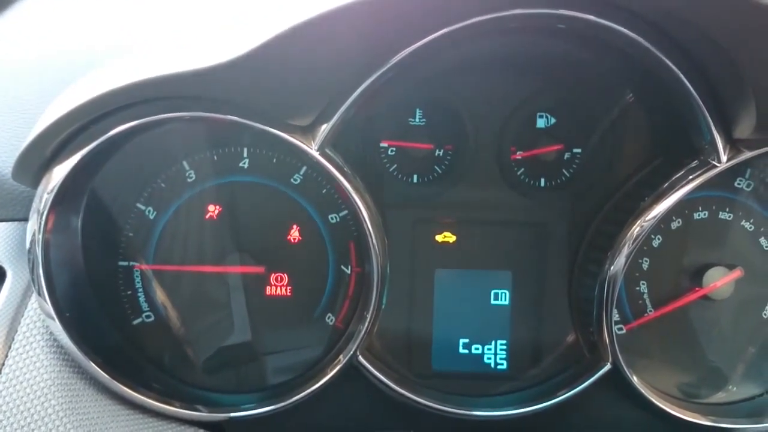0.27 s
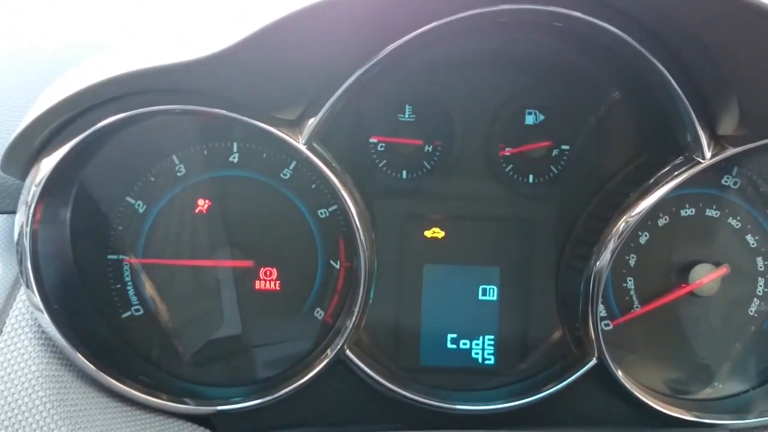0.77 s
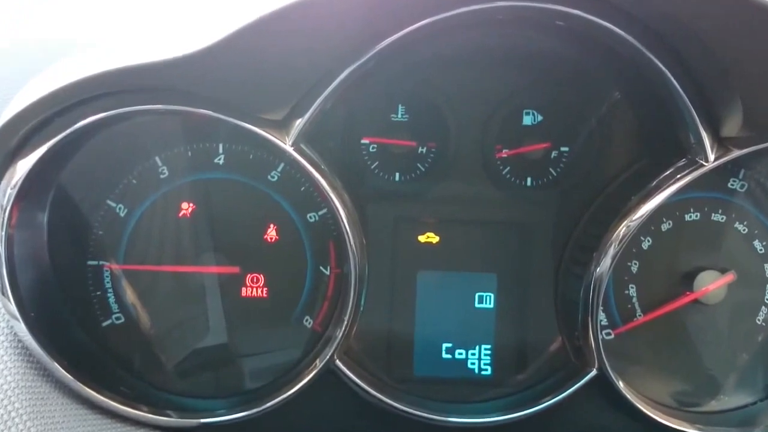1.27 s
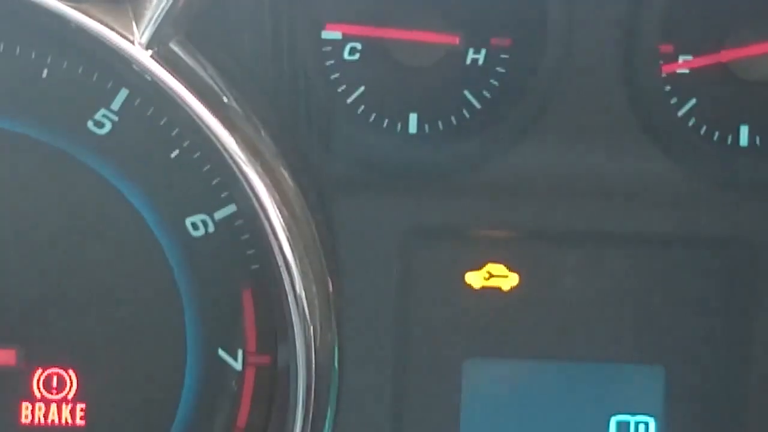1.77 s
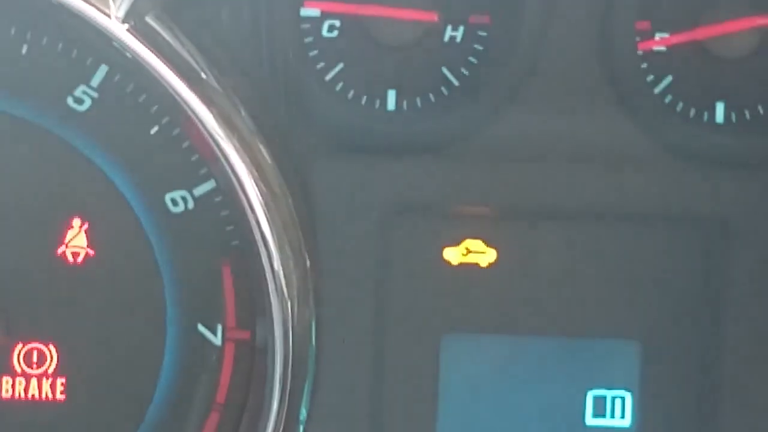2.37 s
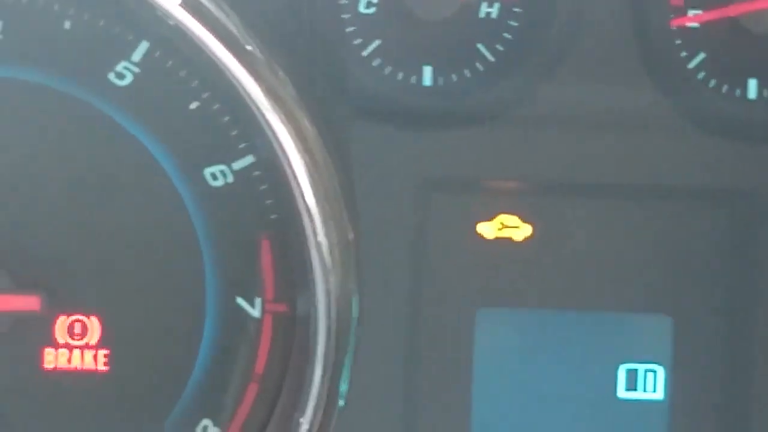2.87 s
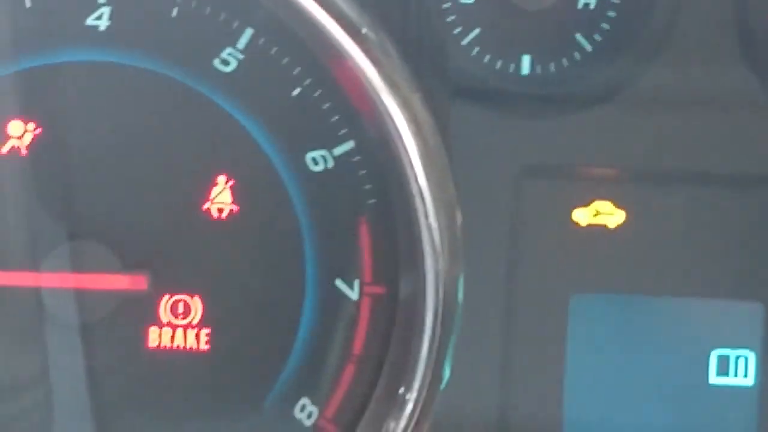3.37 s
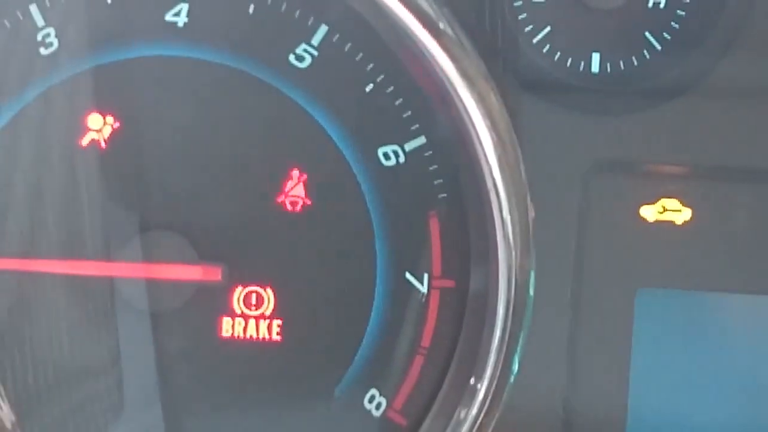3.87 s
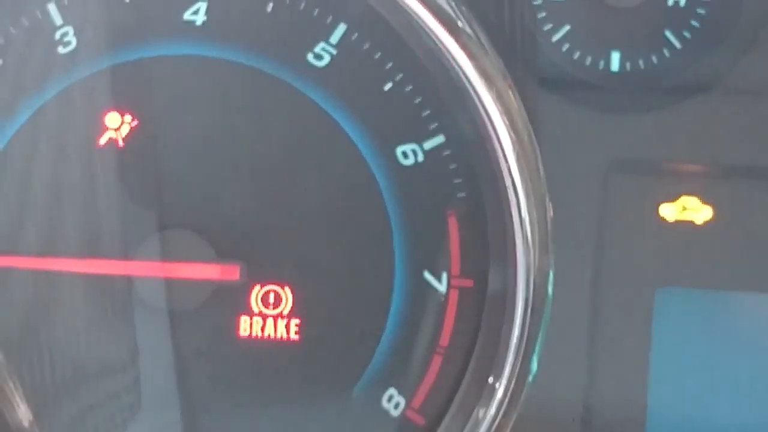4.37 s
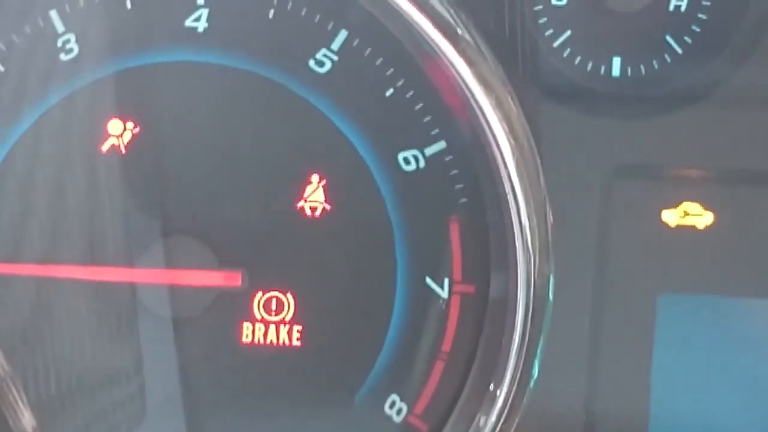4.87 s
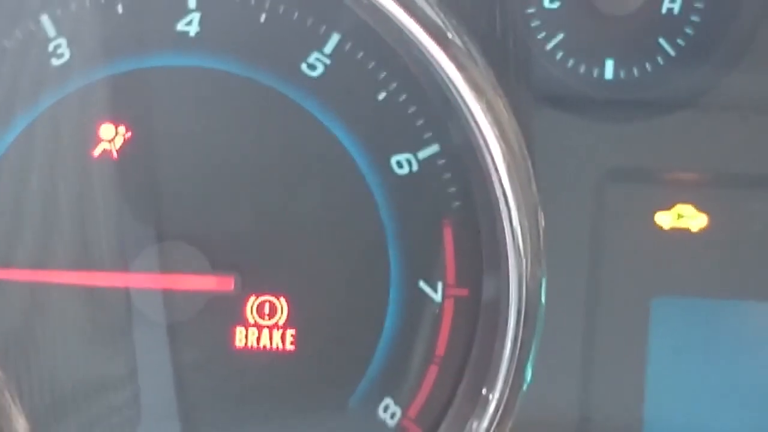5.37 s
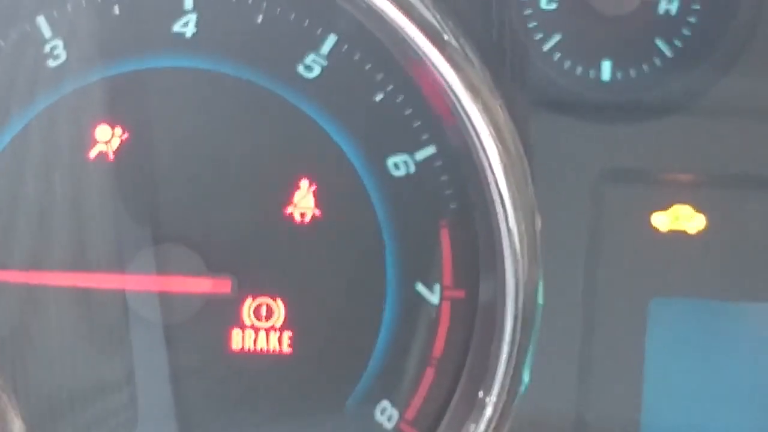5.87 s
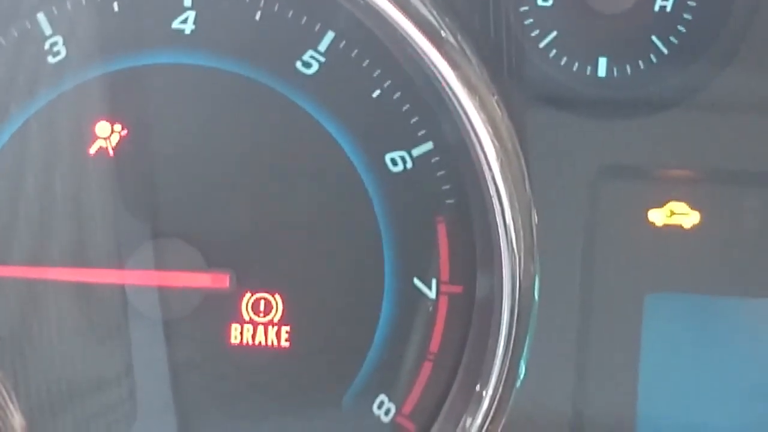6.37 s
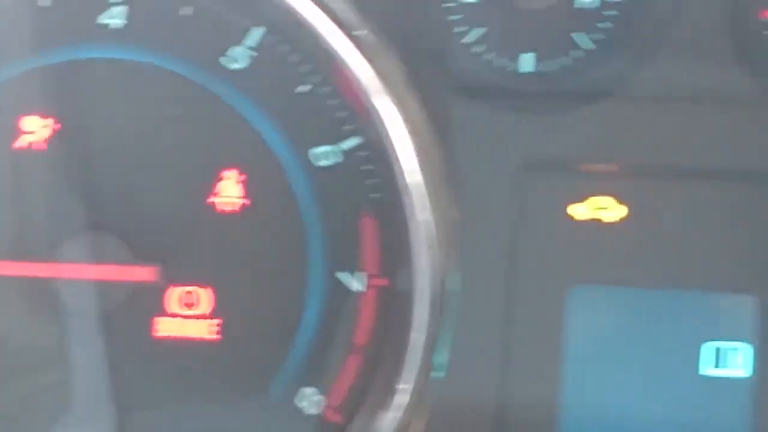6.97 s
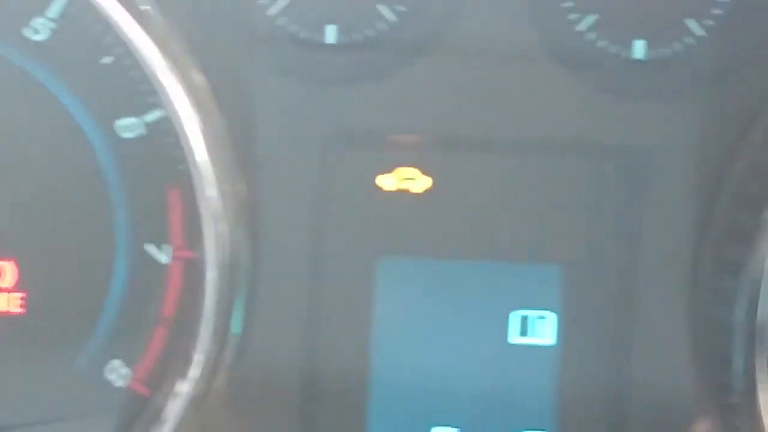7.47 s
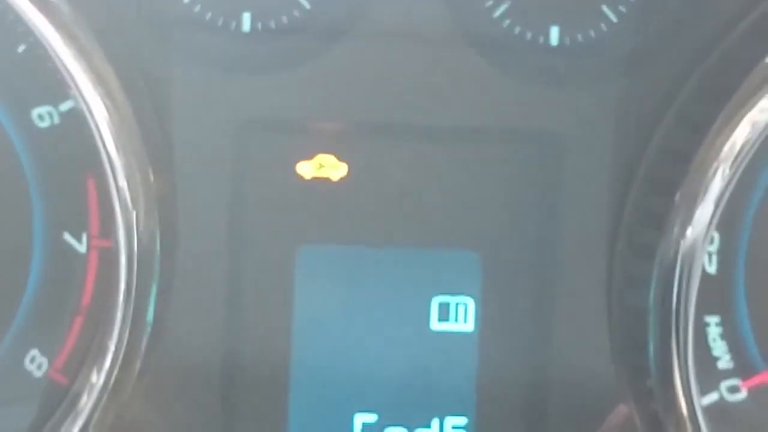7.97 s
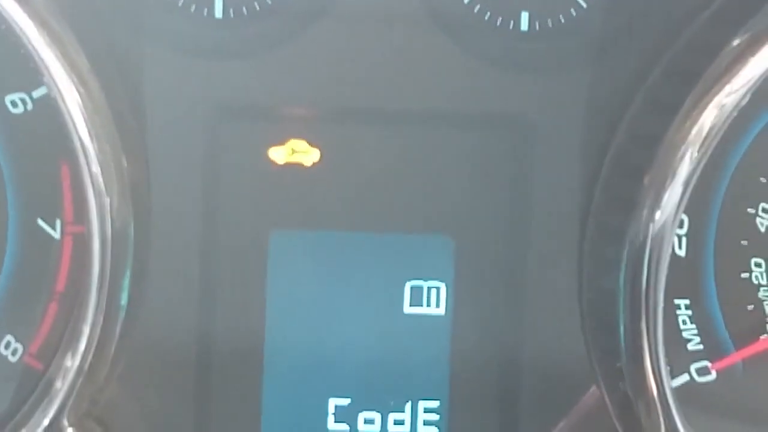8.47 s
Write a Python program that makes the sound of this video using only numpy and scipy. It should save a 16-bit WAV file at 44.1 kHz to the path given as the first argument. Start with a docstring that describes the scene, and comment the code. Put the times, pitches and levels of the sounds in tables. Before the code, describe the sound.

A four-cylinder petrol engine idles for the whole 8.7 seconds, heard inside a closed car from the driver's seat: a deep throbbing drone with a low cabin boom, muffled rumble, faint motor hums and a thin hiss of air. The idle wavers a little, sagging slightly around 2.2 seconds and again near the end. Close to the right microphone, a hand shifts on the camera until about 2.6 seconds, with low thumps, short rubs and plastic clicks near 0.35, 0.75, 1.2 and 1.8. Thin, faint, gliding chirps, perhaps a bird outside, appear around 0.7 to 0.9, very weakly at 3.8, and at 7.2 and 7.7. A soft airy whistle swells at 2.5, then three brief times between 5.0 and 5.5, beside a small dull click at 5.1. Faint grip movements return around 7.3 and 8.1 as the engine keeps running.

```python
"""A four-cylinder petrol engine idles near 1050 rpm throughout, heard from the driver's seat of a closed car:
shaft orders drone and boom over noise rumble, two motor hums and a faint hiss of air, all shaped noise and tones.
Up to 2.6 s a hand shifts its grip on the camera at the right port: noise thumps, rubs, ringing case clicks.
Thin gliding chirps come at 0.7, 3.8 and 7.2 s, a soft noise-band whistle at 2.5 s and three times from 5 s.
One more click falls at 5.1 s; faint grip shifts return at 7.3 and 8.1 s."""
import sys
import numpy as np
from scipy import signal
from scipy.fft import rfft, irfft, next_fast_len
from scipy.io import wavfile
from scipy.ndimage import uniform_filter1d

SR = 44100
rng = np.random.default_rng(int(sys.argv[2]) if len(sys.argv) > 2 else 0)


def pcm_store(signal):
    """Save signal as 16-bit PCM."""
    levels = np.round(np.clip(np.atleast_2d(signal), -1, 1) * 32767)
    wavfile.write(sys.argv[1], SR, levels.astype(np.int16).T)


N = 384091
TIME = np.arange(N) / SR


def undb(db):
    """Decibels to amplitude gain."""
    return 10 ** (np.asarray(db) / 20)


def at(points, hz):
    """Interpolate (Hz, dB) points on a log-frequency axis, flat beyond the ends."""
    points_hz, points_db = np.transpose(points)
    return np.interp(np.log(np.maximum(hz, 1)), np.log(points_hz), points_db)


def colour(x, points):
    """Filter with the gain curve of (Hz, dB) points."""
    size = next_fast_len(N)
    hz = np.arange(size // 2 + 1) * SR / size
    return irfft(rfft(x, size) * undb(at(points, hz)), size)[:N]


def noise(points):
    """Gaussian noise with the density of (Hz, dB per Hz) points."""
    return colour(rng.standard_normal(N), points) * np.sqrt(SR / 2)


def unit(x):
    """Scale to standard deviation 1."""
    return x / np.std(x)


def walk(rate_hz):
    """Random levels, each held 1 / rate_hz and smoothed twice; spread 1."""
    hold = max(int(SR / rate_hz), 1)
    held = np.repeat(rng.standard_normal(N // hold + 1), hold)
    smooth = uniform_filter1d(uniform_filter1d(held, hold), hold)
    return unit(smooth[:N])


def swell(centre_s, width_s):
    """Gaussian bump in time, peak 1; width_s is its standard deviation."""
    return np.exp(-.5 * ((TIME - centre_s) / width_s) ** 2)


def resonance(hz, centre_hz, width_hz):
    """Resonance gain: 1 at the centre, half at width_hz / 2 to either side."""
    return 1 / (1 + (2 * (hz - centre_hz) / width_hz) ** 2)


def engine_line(turns, order, unsteady, shake_hz=9):
    """One order of a turning shaft, rms near 1; uneven running shakes its size and phase."""
    knots_s = np.arange(0, TIME[-1] + 1, .5 / shake_hz)
    size, phase_rad = (np.interp(TIME, knots_s, unsteady * rng.standard_normal(len(knots_s)))
                       for _ in range(2))
    tone = (1 + size) * np.cos(2 * np.pi * (order * turns + rng.random()) + phase_rad)
    return tone * np.sqrt(2 / (1 + unsteady ** 2))


def air(speed_hz, vent_db=0.0, rise_db_per_hz=1.6):
    """Vent air, stronger at higher engine speed, plus microphone hiss; independent noise at each port."""
    # Vent air. Each row: frequency in Hz, left and right density in dB per Hz at mean engine speed.
    vent_points = [(106, -74.5, -88), (402, -99, -99), (930, -106.5, -103), (1410, -108, -104.3),
                   (2480, -111, -106.5), (4260, -116, -110.3), (5450, -120, -109.5), (6700, -127, -119),
                   (12200, -140, -132)]
    # Microphone hiss with two port resonances. Each row: frequency in Hz, left and right density in dB per Hz.
    mic_points = [(6600, -120.5, -119), (7640, -119, -119), (8500, -115.3, -118.5), (9200, -120, -119.4),
                  (11400, -121, -119.8), (12500, -115.8, -117.7), (13600, -121, -120)]

    def two_ports(table):
        """Independent noise from the left and right columns."""
        return np.array([noise(np.array(table)[:, [0, column]]) for column in (1, 2)])

    level_db = vent_db + rise_db_per_hz * (speed_hz - speed_hz.mean())
    return undb(level_db) * two_ports(vent_points) + two_ports(mic_points)


def whistle(centre_hz=2075, width_hz=160, left_db=-5, flutter_db=0.3):
    """A narrow band of air noise swells, flutters and fades; independent at each port."""
    # Each row: centre in seconds, right-port level in dB before flutter, Gaussian width in seconds.
    whistle_events = [(2.54, -79.5, .25), (5.0, -77, 0.078), (5.245, -74, .06), (5.498, -75, .13)]
    hz = np.geomspace(centre_hz / 10, centre_hz * 10, 800)
    band = np.column_stack([hz, 20 * np.log10(resonance(hz, centre_hz, width_hz))])
    level = sum(undb(db) * swell(s, width_s) for s, db, width_s in whistle_events)
    level = level * undb(flutter_db * walk(12))
    return level * np.array([undb(left_db) * unit(noise(band)), unit(noise(band))])


def chirps(arch_hz_per_s2=31000, left_db=-12, waver_hz=120, flutter_db=3.5):
    """Thin chirps, perhaps a bird outside: wavering tones that glide along a shallow arch."""
    # Each row: centre in seconds, right-port peak level in dB before flutter, middle pitch in Hz before waver,
    # glide at the middle in Hz per second, Gaussian width in seconds.
    chirp_events = [(.73, -75, 5420, 3200, .035), (.85, -77, 5560, 900, .045), (3.81, -85, 4980, 4, .05),
                    (7.24, -76, 5470, -900, .07), (7.67, -76.5, 5380, -3200, .055)]
    out = np.zeros(N)
    for s, db, middle_hz, glide_hz_per_s, width_s in chirp_events:
        t = np.clip(TIME - s, -4 * width_s, 4 * width_s)
        hz = middle_hz + glide_hz_per_s * t - arch_hz_per_s2 * t ** 2 + waver_hz * walk(200)
        level = undb(db + flutter_db * walk(90)) * swell(s, width_s)
        out += level * np.sin(2 * np.pi * np.cumsum(hz) / SR)
    return np.array([undb(left_db) * out, out])


def rubbing(grain_db=0.5, grain_hz=260):
    """Skin sticks and slips on plastic: coloured noise with an uneven level; spread 1."""
    # Each row: frequency in Hz, relative density in dB.
    rub_points = [(150, -30.5), (320, 3.5), (430, 5.5), (560, -4.5), (700, -8.5), (1500, -28),
                  (5000, -40.5), (12000, -46)]
    return unit(noise(rub_points) * undb(grain_db * walk(grain_hz)))


def grip(hold_db=-25.5, sway_db=-24, flex_db=-41, rub_db=-63, hiss_db=-72, sag_s=0.13, push_hiss_db=-64):
    """The hand pumps air at the port, flexes the case and rubs on it."""
    # Grip shifts. Each row: centre in seconds, strength in dB on the scale of hold_db, Gaussian width in seconds.
    shift_events = [(0.286, 0, 0.13), (0.573, 3.5, .04), (0.847, -3.5, 0.1), (1.23, 7, 0.047),
                    (1.72, 2, 0.093), (2.04, -2, 0.074), (2.573, -5, 0.12), (7.315, -7, 0.13),
                    (8.102, -12.5, 0.33)]
    # Fingers slide on the case. Each row: centre in seconds, level in dB, Gaussian width in seconds.
    rub_events = [(0.218, -58, 0.018), (0.752, -48, 0.014), (0.835, -64, 0.035), (1.228, -58, 0.0092),
                  (1.816, -45.5, 0.013)]
    # A finger squeezes air into the port. Each row: centre in seconds, push in dB before the sag,
    # Gaussian width in seconds.
    press_events = [(0.398, -3.5, 0.036), (1.847, -3, 0.03)]

    # hold_db: steady tremor of the resting hand
    restless = undb(hold_db) + sum(undb(db) * swell(s, width_s) for s, db, width_s in shift_events)
    sway = unit(noise([(2, -3.5), (5, -2), (10, -9.5), (20, -20.5), (45, -23.5),
                       (150, -46.0), (500, -100), (2000, -140)]))
    flex = unit(noise([(40, -25), (85, -7.5), (103, 7.5), (125, -10.0), (250, -18.5),
                       (900, -61), (4000, -95.5)]))
    hiss = unit(noise([(500, 7.0), (3500, -4.0), (7000, -15), (15000, -19.0)]))
    rub = rubbing()
    mix = undb(sway_db) * sway + undb(flex_db) * flex + undb(rub_db) * rub + undb(hiss_db) * hiss
    out = restless * mix
    for s, db, width_s in rub_events:
        out += undb(db) * swell(s, width_s) * rub
    for s, db, width_s in press_events:
        push = swell(s, width_s)
        # a faint hiss rides on the push, and the pressure sags on both sides of it
        sag = width_s / sag_s * swell(s, sag_s)
        out += undb(db) * (push - sag + undb(push_hiss_db) * push * hiss)
    return out


def clicks(snap_db=-33, snap_ms=0.79):
    """Short pushes ring the damped plastic case; a softer contact leaves only the low modes."""
    # Each row: centre in seconds, strength in dB, contact softness (Gaussian width) in ms,
    # extra weight of the lowest mode in dB, factor on the ring times.
    click_events = [(0.349, -22, 0.58, 1.5, 1.1), (0.7393, -17.5, 0.36, -29, 2),
                    (1.229, -17, 0.082, 2, 1.41), (1.81, -31, 0.26, -12, 2.2),
                    (1.8199, -13, 0.34, -2, 1.43), (5.078, -28, 1.2, -8, 1.8)]
    # Case modes, lowest first. Each row: frequency in Hz, relative level in dB,
    # 60 dB decay time in seconds before the ring factor.
    case_modes = [(278, 6.5, 0.0062), (440, -8.5, 0.0088), (802, -12.5, 0.015), (1525, -0.5, 0.0031),
                  (2060, -28, 0.0031), (3100, -11.5, 0.0032), (5800, -1.5, 0.0062)]
    t = TIME[:SR // 10]
    out = np.zeros(N)
    snap = np.zeros(N)
    for s, db, soft_ms, lowest_db, ring in click_events:
        lowest, *upper = [undb(mode_db - 60 * t / (t60_s * ring)) * np.sin(2 * np.pi * hz * t)
                          for hz, mode_db, t60_s in case_modes]
        body = undb(lowest_db) * lowest + sum(upper)
        ms = (TIME - s) * 1000
        push = np.exp(-.5 * (ms / soft_ms) ** 2)
        out += undb(db) * signal.oaconvolve(push / push.sum(), body)[:N]
        # the bright snap weakens fast with softness
        snap += undb(db + snap_db) * np.exp(-10 * soft_ms - np.abs(ms) / snap_ms)
    return out + snap * rng.standard_normal(N)


def motors(drift=0.00207, unsteady=0.12):
    """Electric motors, likely cooling fan and fuel pump: harmonic hums whose speeds wander a little."""
    # Each row: mean rotation in Hz, list of (harmonic number, level in dB).
    motor_lines = [(122.3, [(1, -47), (2, -82.5), (3, -71)]), (217.6, [(1, -75.5), (3, -87.5), (4, -86)])]
    out = np.zeros(N)
    for hz, harmonics in motor_lines:
        turns = np.cumsum(hz * (1 + drift * walk(1.5))) / SR
        for k, db in harmonics:
            out += undb(db) * engine_line(turns, round(k), unsteady * round(k))
    return out


def rumble(turns, shake, throb=0.19, flicker_db=1.0, shared_db=-1.7, diffuse_db=-5.5, shake_share=0.92):
    """Block noise swells twice a turn, as the firings do; its diffuse part differs between the ports."""
    # Combustion and mechanical noise behind the bulkhead.
    # Each row: frequency in Hz, density in dB per Hz before the shared and diffuse gains.
    block_points = [(25, -56), (45, -64.5), (85, -71), (150, -69.5), (200, -79), (270, -91), (350, -93.5),
                    (440, -93), (550, -98), (690, -97), (770, -104), (900, -103), (1600, -122),
                    (4000, -150)]
    surge = (1 + throb * np.cos(4 * np.pi * turns)) * undb(flicker_db * walk(10))
    surge = surge * (shake / shake.mean()) ** shake_share
    diffuse_tilt = [(130, -4.0), (350, 10.5), (900, -10.5)]
    diffuse = np.array([colour(noise(block_points), diffuse_tilt) for _ in range(2)])
    return surge * (undb(shared_db) * noise(block_points) + undb(diffuse_db) * diffuse)


def drone(turns, speed_hz, shake, firing_unsteady=0.088, unsteady_per_order=.02, boom_unsteady=0.12,
          firing_db=-26, upper_db=-29, boom_db=-39):
    """Two firings a turn and other shaft orders; order 8 booms as it meets the cabin air resonance."""
    # Each row: multiple of crankshaft speed, level in dB re firing_db for order 2, re upper_db for the rest.
    order_levels = [(1, -33), (2, 0), (4, -16.5), (6, -27), (8.5, -31), (9, -35), (10, -31.5), (12, -47),
                    (14, -40.5), (15, -48), (16, -43), (18, -40), (19, -50), (20, -47), (21, -46),
                    (22, -52), (23, -52), (24, -52), (40, -57)]
    boom_order = 8
    boom = undb(boom_db) * resonance(boom_order * speed_hz, centre_hz=141.38, width_hz=5.56)
    out = boom * engine_line(turns, boom_order, boom_unsteady)
    for order, db in order_levels:
        if order == 2:
            out += undb(firing_db + db) * shake * engine_line(turns, order, firing_unsteady)
        else:
            out += undb(upper_db + db) * engine_line(turns, order, unsteady_per_order * order)
    return out


def engine_and_motors(speed_hz, left_bass_cut_hz=41, jitter=0.001623, wander_db=.5):
    """The body shakes less when the idle sags below its resonance; the left port is shaded, thinner in bass."""
    # Left-port shading. Each row: frequency in Hz, gain in dB.
    left_shade = [(140, -3.5), (280, -3), (450, -2), (650, 4), (1000, -6.5)]
    turns = np.cumsum(speed_hz * (1 + jitter * walk(12))) / SR
    # the body resonates near the firing rate
    shake = resonance(2 * speed_hz, centre_hz=35.34, width_hz=3) * undb(wander_db * walk(6))
    left, right = drone(turns, speed_hz, shake) + motors() + rumble(turns, shake)
    bass_cut = signal.butter(1, left_bass_cut_hz, "highpass", fs=SR, output="sos")
    left = signal.sosfilt(bass_cut, left)
    return np.array([colour(left, left_shade), right])


def scene():
    """The hand lies by the right port; a weak, mostly treble share crosses to the left."""
    # The idle hunts a little and sags twice. Each row: time in seconds, crankshaft speed in Hz before jitter.
    idle_speed = [(0.0, 17.88), (0.8, 17.85), (1.05, 17.68), (1.75, 17.67), (2.15, 17.11), (2.45, 17.14),
                  (3.0, 17.39), (3.6, 17.48), (5.2, 17.53), (5.9, 17.78), (7.2, 17.61), (7.65, 17.73),
                  (8.3, 17.29), (8.7, 17.15)]
    speed_hz = np.interp(TIME, *np.transpose(idle_speed))
    hand = grip() + clicks()
    across = colour(hand, [(20, -37), (300, -36), (800, -40.5), (3000, -12.0)])
    background = air(speed_hz) + whistle() + chirps()
    return background + np.array([across, hand]) + engine_and_motors(speed_hz)


def record(dry, top_hz=15720, fade_s=.005):
    """The camera cuts the treble above top_hz; a short linear fade ends the sound."""
    stop = np.minimum((TIME[-1] - TIME) / fade_s, 1)
    # order 10, 0.1 dB ripple, 70 dB stopband
    low_pass = signal.ellip(10, .1, 70, top_hz, fs=SR, output="sos")
    return signal.sosfilt(low_pass, dry * stop)


dry = scene()
out = record(dry)
pcm_store(out)
```